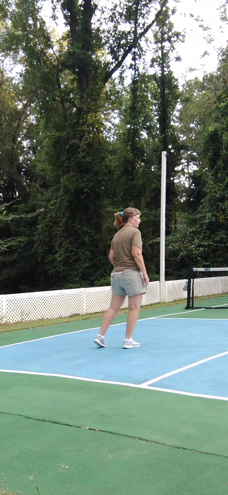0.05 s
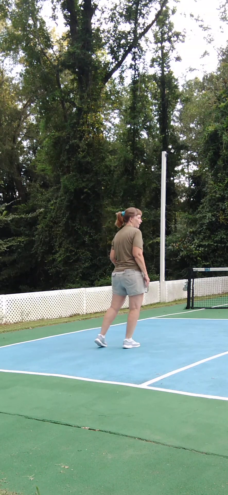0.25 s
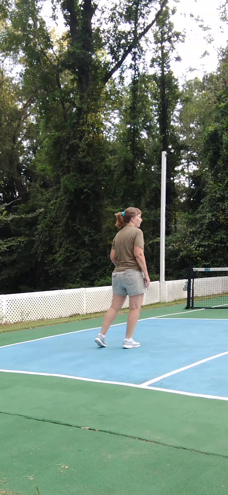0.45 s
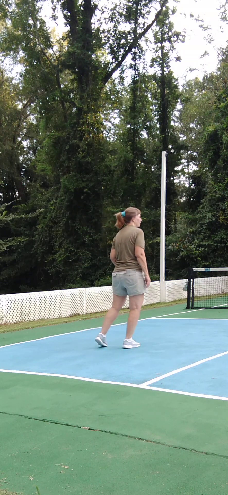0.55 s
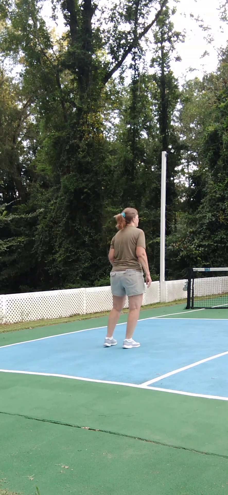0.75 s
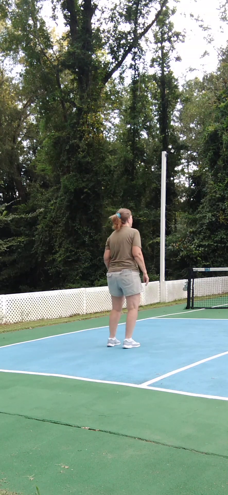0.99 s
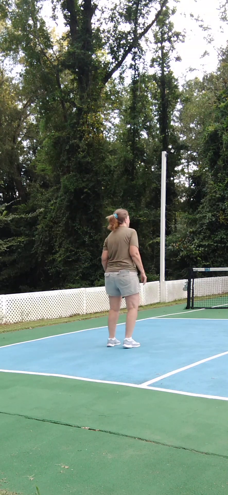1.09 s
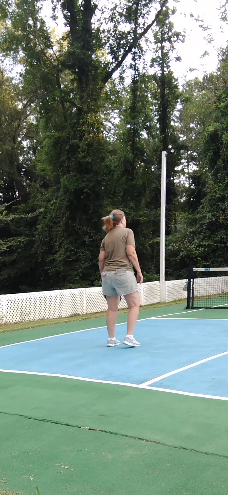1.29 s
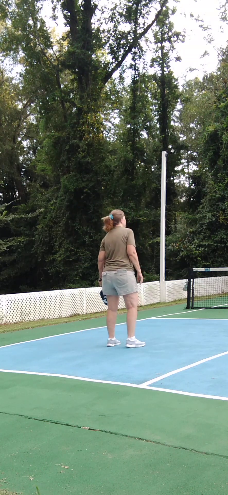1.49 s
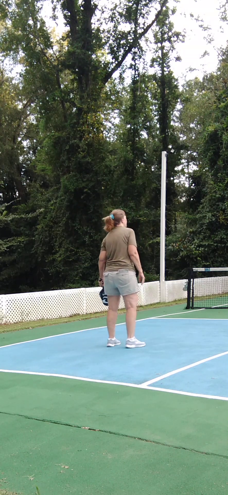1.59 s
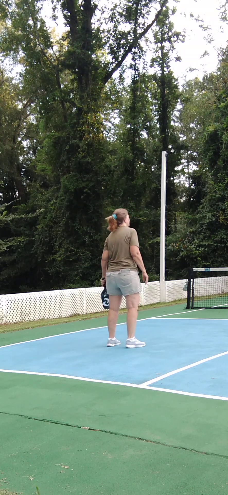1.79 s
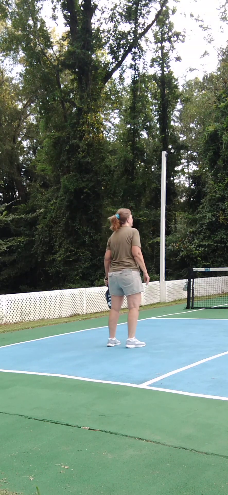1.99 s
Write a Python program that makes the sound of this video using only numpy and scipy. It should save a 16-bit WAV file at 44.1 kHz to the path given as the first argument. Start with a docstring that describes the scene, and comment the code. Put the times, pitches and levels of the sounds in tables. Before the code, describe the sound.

One sharp pickleball paddle hit rings out slightly to the left on an outdoor hard court. A gritty shoe scuff and light steps follow, then a weaker ball bounce slightly to the right, with faint insects and low rumble underneath.

```python
"""A loud, hollow paddle pock from a pickleball game, heard on an outdoor hard court ringed by trees.
Paddle and ball crack and ring; a shoe scuffs over grit, feet tick lightly, and the ball lands
with a softer knock. The fence scatters each blow and the trees return a faint, longer echo.
A steady shrill insect band is turned down in quiet moments and let through briefly around louder
sounds, as by a noise gate. Under it lie a low rumble and the hum of a distant machine."""
import sys
import numpy as np
from scipy import signal
from scipy.fft import rfft, irfft
from scipy.io import wavfile

SR = 44100
rng = np.random.default_rng(int(sys.argv[2]) if len(sys.argv) > 2 else 0)


def wav_record(signal):
    """Record a signal, one row per channel, as 16-bit PCM in the file named by sys.argv[1]."""
    frames = np.transpose(np.atleast_2d(signal))
    bounded = np.clip(frames, -1, 1)
    # unit amplitude maps onto the largest positive 16-bit level
    quanta = np.round(bounded * 32767).astype(np.int16)
    wavfile.write(sys.argv[1], SR, quanta)


N = 90404


def undb(db):
    """Decibels to gain."""
    return 10 ** (np.asarray(db) / 20)


def since(start):
    """Seconds since a moment."""
    return np.arange(N) / SR - start


def pan(x, db):
    """Place a sound to one side: left louder than right by db."""
    return x * undb(np.array([[1], [-1]]) * db / 2)


def shaped(gain_at, wide_hz, spread=1.1):
    """Coloured stereo noise of unit RMS; left and right are nearly alike below wide_hz."""
    hz = np.arange(N // 2 + 1) * SR / N + 1
    mid, side = rfft(rng.standard_normal((2, N))) * gain_at(hz)
    width = .08 + spread / (1 + (wide_hz / hz) ** 5)
    stereo = irfft(mid + side * width * np.array([[1], [-1]]), N)
    return stereo / np.sqrt(np.mean(stereo ** 2))


def noise(colour, wide_hz, spread=.98):
    """Noise whose spectrum follows points of (frequency [Hz], relative level [dB])."""
    hz, db = np.array(colour).T
    return shaped(lambda f: undb(np.interp(np.log(f), np.log(hz), db)), wide_hz, spread)


def band(centre_hz, octaves, wide_hz):
    """Noise in one bell-shaped band."""
    return shaped(lambda f: np.exp(-.5 * (np.log2(f / centre_hz) / octaves) ** 2), wide_hz)


def burst(peak_s, rise, t60, hold=0):
    """Envelope: a smooth rise up to peak_s, a hold, an exponential fall; all in seconds."""
    t = since(peak_s)
    return np.exp(-(np.minimum(t, 0) / rise) ** 2 - np.log(1000) * np.maximum(t - hold, 0) / t60)


def air():
    """The bed of the place: low outdoor rumble and a distant machine's faint, wavering hum."""
    # open-air rumble (frequency [Hz], relative level [dB])
    rumble_colour = [(20, -23.5), (40, -6.5), (58, 4), (85, -2.5), (170, -3.5), (260, -15), (355, -10.5),
                     (450, -17), (900, -22.5), (2500, -28.5), (6000, -28.5), (16000, -33.5)]
    # tones of the machine (frequency [Hz], level [dB])
    hum_tones = [(58, -81.5), (117, -88), (169, -90.5), (233, -93.5), (292, -94.5), (351, -87), (471, -99)]
    rumble = undb(-78) * noise(rumble_colour, wide_hz=800)
    hum = sum(undb(db) * band(hz, octaves=2 / hz, wide_hz=900) for hz, db in hum_tones)
    return rumble + hum


def insects():
    """Steady insects near 8.5 kHz, held low and let through at set times, as by a noise gate."""
    # insect band while turned down (frequency [Hz], relative level [dB])
    closed_colour = [(3000, -61), (6500, -40), (7300, -21.5), (8000, -2.5), (8600, 1), (9000, -7),
                     (9450, -19), (10300, -16.5), (11400, -42), (16000, -42.5)]
    # insect band while let through (frequency [Hz], relative level [dB])
    open_colour = [(500, -49), (2500, -40), (4800, -42), (5500, -31), (7100, -23), (8000, -2), (8600, 4),
                   (9050, -5.5), (9600, -26), (11000, -34), (12500, -52), (16000, -64)]
    # gate openings, placed around the louder sounds (start [s], length [s], level [dB])
    openings = [(-.03, 0.072, -42.5), (0.231, 0.083, -40), (0.633, 0.25, -41), (1.408, 0.028, -53.5),
                (1.692, 0.2, -41)]
    attack_s, sag_db_per_s, release_db_per_s = .0028, 17.5, 215.5
    gate = np.zeros(N)
    for start, length, db in openings:
        sag_db = sag_db_per_s * np.maximum(since(start), 0)
        release_db = release_db_per_s * np.maximum(since(start + length), 0)
        gate += undb(db - sag_db - release_db) * np.clip(since(start) / attack_s, 0, 1)
    turned_down = undb(-60.5) * noise(closed_colour, wide_hz=1000)
    let_through = gate * noise(open_colour, wide_hz=1005.5)
    return pan(turned_down, db=-2) + pan(let_through, db=-2.5)


def trees(start, db, t60):
    """Faint, long echo from the trees around the court."""
    # tree echo (frequency [Hz], relative level [dB])
    echo_colour = [(60, 3), (250, 11), (700, 2.5), (1000, -4), (1320, -1.5), (1800, -10.5), (3200, -4),
                   (6000, -3.5), (9000, -5.5), (15000, -20.5)]
    return undb(db) * noise(echo_colour, wide_hz=500) * burst(start + .03, .015, t60)


def fence(start, colour, db, t60, farthest_s, end_t60):
    """Dense echoes from the fence, which die faster once the farthest have arrived."""
    envelope = burst(start + .004, .0014, t60) * burst(start, .0009, end_t60, hold=farthest_s)
    return undb(db) * noise(colour, wide_hz=470, spread=1.37) * envelope


def reflect(x, strength):
    """Direct sound plus early reflections off the court and surfaces near the microphone."""
    # reflections (left delay [s], right delay [s], relative level [dB])
    paths = [(.0012, .0011, -9), (.0036, .0039, -1), (.0056, .0054, -7.5), (0.0131, .0135, -17.5),
             (.019, .0192, -17.5)]
    direct = x * np.ones((2, 1))
    echoes = np.zeros((2, N))
    for left_s, right_s, db in paths:
        for channel, delay_s in enumerate((left_s, right_s)):
            echoes[channel] += undb(db) * np.roll(direct[channel], int(delay_s * SR))
    return direct + strength * echoes


def feet():
    """Quiet footwork on the court: ticks of grit, dull footfalls and light shuffling."""
    # ticks of feet and grit (time [s], level [dB], centre [Hz], width [octaves])
    grit_ticks = [(0.8205, -53.5, 4810, 0.71), (.869, -52, 1010, 0.67), (0.869, -49, 3400, 1.26),
                  (0.8826, -55, 880, .6), (.917, -62, 1710, 0.75), (1.412, -61, 6340, 1.1)]
    # footfalls (time [s], level [dB])
    footfalls = [(0.492, -69), (0.676, -68.5), (.888, -60.5), (.935, -81)]
    # thud of a footfall (frequency [Hz], relative level [dB])
    thud_colour = [(25, -24), (60, 6.5), (100, -7), (200, -11), (600, -23.5), (3000, -53)]
    # shuffling shoes (time [s], level [dB], centre [Hz], width [octaves], rise [s], t60 [s])
    shoe_shuffles = [(.04, -68.5, 2980, 0.92, 0.036, 0.23), (.47, -71.5, 2600, 1.4, .03, 0.24),
                     (.848, -59, 3370, 0.23, 0.0064, 0.1), (0.851, -59, 6130, 0.27, 0.012, 0.23),
                     (1.075, -80, 2240, 0.24, 0.0097, .3), (1.125, -83.5, 4497, 0.8, .01, 0.22),
                     (1.324, -80.5, 1080, 0.9, 0.029, 0.35), (1.419, -83, 1500, 1.1, .025, 0.18),
                     (1.876, -60, 5900, 0.22, 0.0029, 0.081), (1.872, -74, 1480, 1.5, 0.0075, 0.068)]
    ticks = np.zeros((2, N))
    for at, db, hz, octaves in grit_ticks:
        click_and_tail = burst(at, .00036, .0044) + undb(-12.5) * burst(at, .0018, .16)
        ticks += undb(db) * band(hz, octaves, wide_hz=3450) * click_and_tail
    steps = sum(undb(db) * burst(at, .021, .37) for at, db in footfalls)
    thuds = noise(thud_colour, wide_hz=700) * steps
    shuffles = sum(undb(db) * band(hz, octaves, wide_hz=2486) * burst(at, rise, t60)
                   for at, db, hz, octaves, rise, t60 in shoe_shuffles)
    soft_sole = signal.butter(3, 9000, fs=SR, output="sos")
    return signal.sosfilt(soft_sole, ticks) + thuds + shuffles


def scuffs():
    """A sole brushes the court, then grips and rasps over its grit."""
    # scuffs, loudest first (time [s], rise [s], t60 [s], level [dB])
    grips = [(0.6559, 0.0046, 0.067, -29.5), (0.0062, 0.018, 0.27, -63.5)]
    # rasping sole (frequency [Hz], relative level [dB])
    sole_colour = [(300, -53), (560, -27), (850, -8), (1500, -11.5), (2300, -2.5), (3700, 0), (6000, 3),
                   (8500, 14.5), (10500, -3.5), (16000, -17)]
    # brush before the grip (frequency [Hz], relative level [dB])
    brush_colour = [(500, -29.5), (4200, -20.5), (5600, -4), (8800, 1.5), (10500, -7), (16000, -17.5)]
    grain_samples, grain_db = 40, 2.5
    grit = undb(grain_db * np.repeat(rng.standard_normal(N // grain_samples + 1), grain_samples)[:N])
    envelope = sum(undb(db) * burst(at, rise, t60, hold=.006) for at, rise, t60, db in grips)
    rasp = noise(sole_colour, wide_hz=7994) * grit * envelope
    grip_s = grips[0][0]
    brush = undb(-36.5) * noise(brush_colour, wide_hz=4000) * burst(grip_s - .0135, .0019, .21)
    echo = undb(-42.5) * noise(sole_colour, wide_hz=603) * burst(grip_s + .037, .02, .15)
    return reflect(rasp, .91) + brush + echo


def push(start, half_width_s):
    """Pressure pulse of the ball flattening and springing back."""
    u = since(start) / half_width_s - 2
    return (u ** 2 - 1) * np.exp(-u ** 2 / 2) * (since(start) > 0)


def ring(start, modes, contact_s, cut_hz):
    """Decaying modes set off by a short push; a small body radiates little below cut_hz."""
    t = np.maximum(since(start), 0)
    onset = 1 - np.exp(-t / contact_s)
    tones = sum(undb(db) * np.sin(2 * np.pi * hz * t) * np.exp(-np.log(1000) * t / t60)
                for hz, db, t60 in modes)
    return signal.sosfilt(signal.butter(2, cut_hz, "high", fs=SR, output="sos"), onset * tones)


def knock():
    """The ball lands softly and chatters, a little to the right: a weaker pock with echoes."""
    # contacts of the ball (delay [s], relative level [dB])
    contacts = [(0, 0.5), (0.0147, -10), (.0184, -9.5)]
    # modes of the knock (frequency [Hz], relative level [dB], t60 [s])
    modes = [(290, -51.5, 0.11), (388.6, -40.5, 0.044), (673, -42, 0.045), (990, -62.5, 0.013),
             (1520, -48.5, 0.032), (2042, -46.5, 0.051), (2700, -45.5, 0.04), (4040, -45.5, 0.019)]
    # contact crack (frequency [Hz], relative level [dB])
    crack_colour = [(150, -25), (500, -6), (1300, -3), (2500, 4.5), (6000, -33), (8400, 7), (10500, 1),
                    (16000, -17)]
    # scatter off the fence (frequency [Hz], relative level [dB])
    fence_colour = [(100, -30), (190, -32), (290, 4), (750, -7), (1250, -14.5), (2200, -2.5), (3500, -11.5),
                    (6300, -6.5), (8400, 8), (10500, -5), (13000, -23), (16000, -20)]
    start = 1.6966
    chatter, body = np.zeros((2, N))
    for delay, db in contacts:
        at = start + delay
        chatter += undb(db) * burst(at + .00038, .00037, .013)
        pulse = undb(-40.5) * push(at, half_width_s=.00047)
        body += undb(db) * (pulse + ring(at, modes, contact_s=.00018, cut_hz=540))
    crack = undb(-34) * noise(crack_colour, wide_hz=4000) * chatter
    echoes = fence(start, fence_colour, db=-41.5, t60=.42, farthest_s=.035, end_t60=.25)
    echoes += trees(start, db=-70, t60=.41)
    return pan(reflect(crack, .8), db=-2) + reflect(body, .14) + echoes


def stroke():
    """The paddle hits the ball hard, a little to the left: crack, pulse, hollow ring and echoes."""
    # modes of paddle and ball (frequency [Hz], relative level [dB], t60 [s])
    modes = [(268.7, -25.5, .085), (359.5, -19.5, .05), (549, -21, 0.025), (875, -19.5, 0.034),
             (1263, -20.5, 0.11), (1422, -20.5, .02), (2044, -16.5, 0.02), (3134, -30.5, .09),
             (4380, -24.5, 0.037), (5370, -37, 0.074), (7460, -26, 0.066), (8100, -20, 0.025)]
    # contact crack (frequency [Hz], relative level [dB])
    crack_colour = [(100, -11.5), (400, -20), (1000, 0), (2700, -8.5), (4400, -1), (6000, -9.5),
                    (8300, 6.5), (10500, -13), (16000, -18)]
    # bright hiss trailing the blow (frequency [Hz], relative level [dB])
    hiss_colour = [(1500, -24.5), (3200, -11.5), (4500, -9.5), (5700, -3.5), (8500, 5), (10300, -8.5),
                   (12000, -19), (16000, -27)]
    # scatter off the fence (frequency [Hz], relative level [dB])
    fence_colour = [(40, -23.5), (110, -10), (230, 7), (520, 0.5), (850, -4), (1080, -18), (1350, -4),
                    (1750, -15), (2100, -12.5), (2700, -13), (4300, -6.5), (6000, -22), (8300, -3.5),
                    (10500, -15), (16000, -26.5)]
    # modes lingering in the tree echo (frequency [Hz], level [dB], t60 [s])
    lingering_modes = [(1210, -46, 0.18), (1370, -59, 0.47), (3150, -55, .35), (4180, -51.5, .22)]
    start, far_fence_delay_s = .238, .0495
    snap = burst(start + .0003, .00017, .007, hold=.00067)
    crack = undb(-13) * noise(crack_colour, wide_hz=3680) * snap
    pulse = undb(-13) * push(start, half_width_s=.0006)
    body = pulse + ring(start, modes, contact_s=.0002, cut_hz=130)
    slap = undb(-23) * np.roll(body, int(far_fence_delay_s * SR))
    hiss = undb(-31.5) * noise(hiss_colour, wide_hz=1000) * burst(start + .018, .01, .29)
    echoes = sum(undb(db) * band(hz, octaves=.035, wide_hz=700) * burst(start + .013, .014, t60)
                 for hz, db, t60 in lingering_modes)
    echoes += fence(start, fence_colour, db=-24, t60=.22, farthest_s=.051, end_t60=.12)
    echoes += trees(start, db=-56, t60=.7)
    return pan(reflect(crack, .91), db=2.5) + reflect(body, .11) + slap + pan(echoes, db=1.5) + hiss


def scene():
    """The play on court over insects and quiet outdoor air."""
    return stroke() + knock() + scuffs() + feet() + insects() + air()


def record(dry):
    """The recorder cuts the highest treble steeply."""
    top_hz = 15900
    return signal.sosfilt(signal.ellip(10, .2, 80, top_hz, fs=SR, output="sos"), dry)


dry = scene()
out = record(dry)
wav_record(out)
```